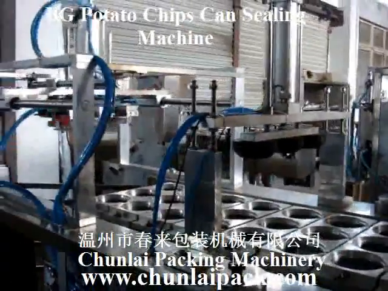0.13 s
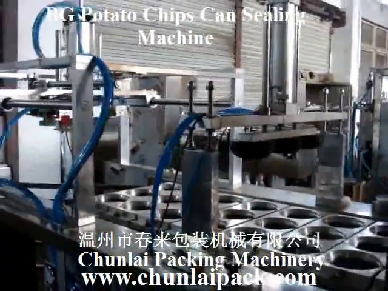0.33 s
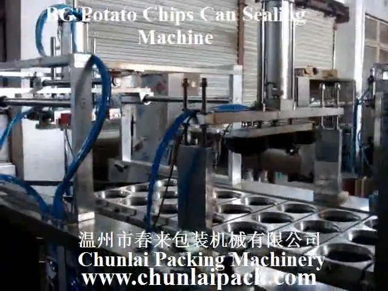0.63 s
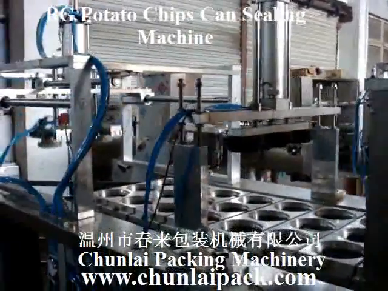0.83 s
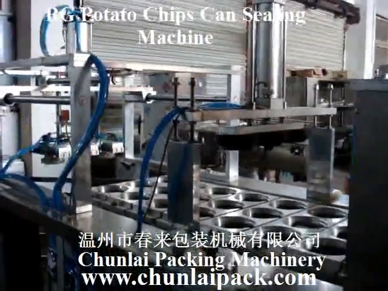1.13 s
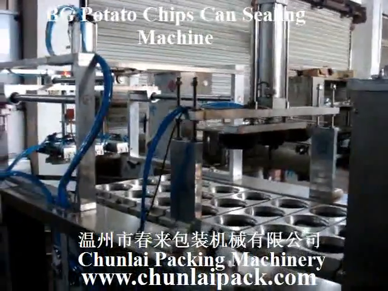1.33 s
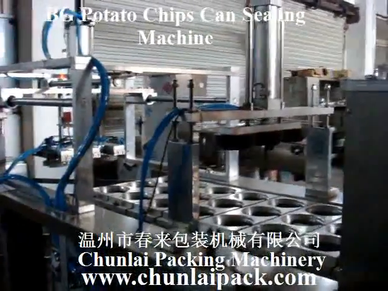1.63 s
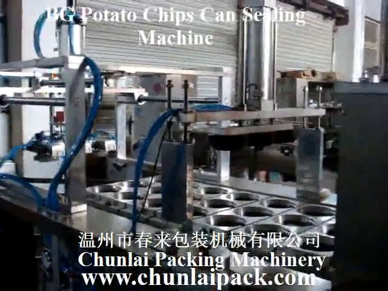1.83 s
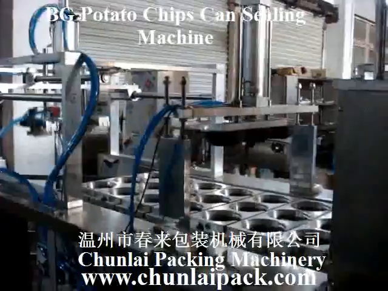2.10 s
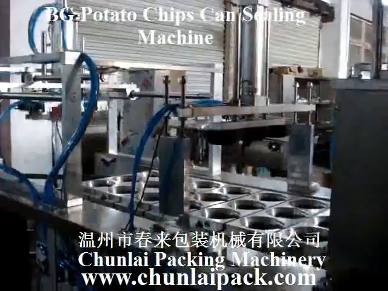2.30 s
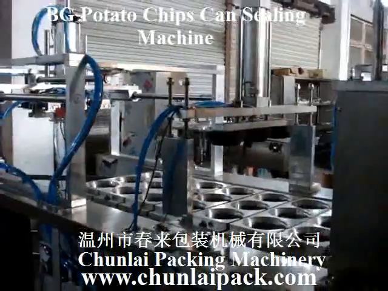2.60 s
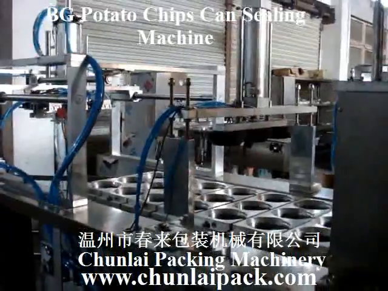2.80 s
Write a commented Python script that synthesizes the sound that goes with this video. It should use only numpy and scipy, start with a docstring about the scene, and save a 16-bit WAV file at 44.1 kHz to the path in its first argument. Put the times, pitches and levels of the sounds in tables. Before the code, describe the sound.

A pneumatic packaging machine hisses and knocks in a workshop. Air rushes hollowly with a couple of knocks, then a loud, bright blast vents from about 0.6 to 1.2 seconds. Short puffs, quick metal knocks and a brief shuddering rush follow. A second blast runs from 1.8 to 2.4 seconds, then two puffs with knocks near 2.6 and 2.8. A thin leak and motor drone lie beneath.

```python
"""A workshop, where a pneumatic can-sealing machine works through its cycle.
Two valves vent in long bright blasts, smaller ones puff, air rushes hollowly through the
suction lines and cylinders knock on their stops. A thin leak, diffuse hiss and the drone of
motors lie beneath; the mono recorder turns its gain down under the blasts."""
import sys
import numpy as np
from scipy import signal
from scipy.fft import rfft, irfft
from scipy.io import wavfile
from scipy.ndimage import uniform_filter1d

SR = 44100
rng = np.random.default_rng(int(sys.argv[2]) if len(sys.argv) > 2 else 0)


def store_wav(level_fs):
    """Save 16-bit WAV to argv[1]."""
    pcm = np.round(np.clip(np.atleast_2d(level_fs), -1, 1) * 32767)
    wavfile.write(sys.argv[1], SR, pcm.T.astype(np.int16))


N = 130095
T = np.arange(N) / SR
HZ = np.maximum(np.arange(N // 2 + 1) * SR / N, 1)
CUTOFF_HZ = 8560


def exhausts():
    """Two big valves vent in a bright hiss, coloured by narrow resonances of room and steel frame."""
    # Each row: opening and closing time in seconds.
    spans = [(.635, 1.188), (1.847, 2.43)]
    # Each row: level in dB, slope while open in dB/s, fall after closing in dB/s.
    flows = [(-11.5, -6.5, 211), (-12, 5, 191)]
    # One hiss spectrum per valve. Each row: frequency in Hz, level in dB.
    colours = [
        [(100, -58), (300, -24), (800, -9), (1150, -12.5), (2200, -7), (3600, -4.5), (4700, -2), (5800, 3),
         (6500, 5.5), (7300, 1), (8400, 4)],
        [(100, -28.5), (300, -23.5), (800, -13.5), (1400, -16), (2100, -9.5), (3300, -8), (4100, -2),
         (4800, -7), (6400, 0), (7400, -5), (8400, -1.5)],
    ]
    # One list per valve. Each row: frequency in Hz, width in Hz, level in dB against the hiss.
    resonances = [
        [(1564, 36, -18.5), (3110, 90, -18.5), (3980, 34, -17), (4090, 30, -19), (4160, 36, -23.5),
         (5012, 16, -20), (5440, 25, -29), (5440, 44, -16.5), (6350, 30, -18), (5940, 20, -25.5),
         (5843, 40, -10), (6750, 31, -11.5), (7480, 37, -18.5), (7550, 78, -11)],
        [(2304, 21, -23), (3910, 50, -17.5), (3800, 20, -23), (4480, 28, -16), (4900, 22, -21),
         (5055, 50, -13.5), (5480, 25, -21), (5560, 24, -18), (5810, 25, -22), (5900, 30, -18), (6660, 17, -25),
         (6960, 43, -15.5), (6390, 45, -14), (7103, 50, -10)],
    ]
    out = 0
    for span_s, (db, slope_db_s, fall_db_s), colour, modes in zip(spans, flows, colours, resonances):
        hiss = turbulence(colour)
        ring = sum(from_db(mode_db) * resonance(hz, width_hz) for hz, width_hz, mode_db in modes)
        flow = valve(*span_s, rise_s=.007, fall_db_s=fall_db_s, slope_db_s=slope_db_s)
        out += from_db(db) * (hiss + ring) * flow
    return out * flutter(depth_db=.5, rate_hz=47)


def puffs():
    """Small valves spit briefly as they switch."""
    # Each row: start, rise and length in seconds, level in dB, fall in dB/s.
    spits = [(0.258, 0.0068, 0.03, -17, 74), (1.339, 0.018, 0.0081, -14.5, 336),
             (1.484, .006, 0.02, -26.5, 118), (1.573, .008, 0.027, -27, 121.5),
             (1.751, .008, 0.049, -20, 81), (2.554, 0.0027, 0.008, -12, 480),
             (2.779, 0.012, 0.0067, -20, 104)]
    # Jet spectrum. Each row: frequency in Hz, level in dB.
    colour = [(200, -43), (1000, -15), (2500, -7), (4200, -2.5), (5800, 3.5), (7300, 1.5), (8400, 2.5)]
    flow = sum(from_db(db) * valve(start_s, start_s + length_s, rise_s, fall_db_s)
               for start_s, rise_s, length_s, db, fall_db_s in spits)
    return flow * turbulence(colour)


def suction():
    """Air rushes unevenly through a pipe whose hollow note fades; the second stroke shudders."""
    # Each row: start and stop in seconds, level in dB, slope in dB/s, pipe resonance in Hz.
    strokes = [(-.02, 0.655, -20, -3.5, 766), (1.671, 1.851, -20.5, -13, 890)]
    # Rush spectrum. Each row: frequency in Hz, level in dB.
    colour = [(50, -58), (110, -17), (200, -11.5), (290, -4), (385, 4), (470, 3.5), (580, 3), (900, 0),
              (1200, 0.5), (1700, -2.5), (2300, -4), (3200, -13.5), (5000, -19.5), (8400, -10.5)]
    rise_s, fall_db_s, pipe_fade_db_s = .019, 1007, 8
    shudder = from_db(-34.5) * resonance(hz=135, width_hz=120)
    out = shudder * valve(1.73, 1.857, rise_s, fall_db_s)
    for start_s, stop_s, db, slope_db_s, pipe_hz in strokes:
        pipe_db = -3.5 - pipe_fade_db_s * np.maximum(T - start_s, 0)
        pipe = from_db(pipe_db) * resonance(pipe_hz, width_hz=170)
        rush = cabinet(turbulence(colour) + pipe)
        out += from_db(db) * rush * valve(start_s, stop_s, rise_s, fall_db_s, slope_db_s)
    return out * flutter(depth_db=1.5, rate_hz=92)


def knocks():
    """Cylinders hit their stops: part and steel frame ring under a clatter. Cushioned stops are duller."""
    # Each entry: time of impact in seconds.
    times = [.004, .263, .643, 1.138, 1.489, 1.589, 1.685, 1.73, 1.769, 1.849, 1.915, 2.553, 2.787]
    # Each row: level in dB, low-pass in Hz, clatter T60 in seconds, pitch of the struck part in Hz,
    # its level in dB against the clatter.
    impacts = [(-18, 1200, 0.36, 814, 3.5), (-15, 2500, .05, 680, -6), (-19.5, 1100, .025, 410, 10.5),
               (-33.5, 230, 0.07, 100, 5), (-24.5, 1700, 0.065, 1100, 2.5), (-19, 5000, 0.099, 940, -8),
               (-23, 2800, 0.063, 740, -1), (-14.5, 1500, 0.067, 680, -9.5), (-18, 1600, 0.064, 1250, 4.5),
               (-14, 2800, .03, 1900, 1), (-19, 1400, 0.39, 850, -6), (-15.5, 1350, 0.023, 650, 3),
               (-17.5, 1120, 0.21, 1040, -8.5)]
    # Each row: frequency in Hz, level in dB, T60 in seconds.
    frame_modes = [(283, -10, 0.13), (381, -3, 0.09), (645, -18, 0.067), (835, -6, 0.098),
                   (1130, -6.5, 0.047), (1325, -15, 0.13), (1640, -7.5, 0.055), (2370, -4.5, 0.055),
                   (2640, -11, .08)]
    clatter = from_db(-1) * turbulence([(40, -27.5), (140, -14), (400, 9.5), (1800, 17), (8000, -11)])
    out = 0
    for start_s, (db, lowpass_hz, clatter_t60_s, part_hz, part_db) in zip(times, impacts):
        age_s = np.maximum(T - start_s, 0)
        ring_s = age_s[age_s < .5]
        ring = 0
        for hz, mode_db, t60_s in frame_modes:
            decay = from_db(mode_db + rng.normal(0, 2.9) - 60 * ring_s / t60_s)
            ring += decay * rng.choice([-1, 1]) * np.cos(2 * np.pi * hz * ring_s)
        frame = from_db(-10.5) * np.pad(ring, (0, N - len(ring)))
        part = from_db(part_db) * resonance(part_hz, width_hz=260)
        burst = (T > start_s) * from_db(-60 * np.minimum(age_s / clatter_t60_s, 2))
        out += from_db(db) * butterworth(frame + (clatter + part) * burst, "low", lowpass_hz)
    return butterworth(out, "high", hz=125, order=3)


def leak():
    """Escaping air hisses thinly, fading away and returning."""
    # Each row: time in seconds, level in dB.
    curve = [(0, -26), (.6, -26.5), (1.2, -30), (1.3, -33), (1.48, -32.5), (1.7, -27.5), (1.85, -28),
             (2.45, -72.5), (2.58, -27), (2.775, -51.5), (2.795, -26), (2.95, -26.5)]
    # Each row: frequency in Hz, level in dB.
    colour = [(1500, -38.5), (3300, -17), (4400, -3), (5400, -20), (6800, -8.5), (7600, -1), (8050, 7),
              (8450, 0.5)]
    return level(curve) * turbulence(colour) * flutter(depth_db=1.9, rate_hz=60)


def hall_hiss():
    """Diffuse hiss fills the hall."""
    # Each row: time in seconds, level in dB.
    curve = [(0, -23.5), (1.2, -24.5), (1.38, -27), (1.46, -30.5), (1.65, -30), (2.45, -24.5), (2.6, -26),
             (2.7, -32), (2.775, -35), (2.82, -29.5), (2.95, -35.5)]
    # Each row: frequency in Hz, level in dB.
    colour = [(400, -35), (1000, 6), (2200, 12), (3200, 10.5), (4500, 9), (5600, 8), (6800, 3), (8400, -23)]
    return level(curve) * turbulence(colour)


def motors():
    """A wavering drone, coloured by the cabinet."""
    # Each row: time in seconds, level in dB.
    curve = [(0, -34.5), (1.2, -38), (1.4, -32), (1.85, -32.5), (2.5, -32), (2.62, -30), (2.75, -33),
             (2.95, -31)]
    # Each row: frequency in Hz, level in dB.
    colour = [(25, -23.5), (45, -26.5), (70, -25.5), (95, -14), (125, -7.5), (190, -7), (280, 0), (520, 4),
              (850, 5), (1100, 1), (1600, -1.5), (3000, -13.5), (8000, -37)]
    return cabinet(level(curve) * turbulence(colour) * flutter(depth_db=1, rate_hz=41))


def cabinet(x):
    """The hollow cabinet boosts a sound at its resonances."""
    # Each row: frequency in Hz, width in Hz, boost in dB.
    modes = [(127, 7, 6), (189, 8.2, 4), (274.7, 13.4, 8.5), (384.5, 6.1, 8), (641.4, 8.8, 5.5),
             (737, 8.4, 7), (845.4, 11, 7.5), (1173, 7, 4.5), (1384, 23, 1), (1400, 17, 2.5)]
    return x + sum((from_db(db) - 1) * signal.lfilter(*signal.iirpeak(hz, hz / width_hz, fs=SR), x)
                   for hz, width_hz, db in modes)


def reflections(x, t60_s):
    """Dense, dying reflections from hard surfaces."""
    tail = rng.standard_normal(N) * from_db(-60 * T / t60_s) * (T > .003)
    return signal.fftconvolve(x, tail / np.sqrt(np.sum(tail ** 2)))[:N]


def valve(open_s, close_s, rise_s, fall_db_s, slope_db_s=0):
    """Flow envelope: linear rise, level or sloping hold, exponential fall after closing."""
    rise = np.clip((T - open_s) / rise_s, 0, 1)
    held_s = np.clip(T - open_s, 0, close_s - open_s)
    return rise * from_db(slope_db_s * held_s - fall_db_s * np.maximum(T - close_s, 0))


def turbulence(colour):
    """Noise with a spectrum of (Hz, dB) points, rolled off at CUTOFF_HZ."""
    hz, db = np.transpose(colour)
    gain = from_db(np.interp(np.log(HZ), np.log(hz), db))
    return shaped_noise(gain / (1 + (HZ / CUTOFF_HZ) ** 40))


def resonance(hz, width_hz):
    """Turbulence ringing in one resonance."""
    detune_hz = (HZ ** 2 - hz ** 2) / (2 * HZ)
    return shaped_noise(1 / (1 + (1.3 * detune_hz / width_hz) ** 2))


def flutter(depth_db, rate_hz):
    """Randomly wandering gain; depth is rms."""
    return from_db(depth_db * shaped_noise(1 / (1 + (HZ / rate_hz) ** 2)))


def shaped_noise(gain):
    """Unit-rms noise, weighted by a gain per frequency."""
    noise = irfft(rfft(rng.standard_normal(N)) * gain, N)
    return noise / np.sqrt(np.mean(noise ** 2) + 1e-20)


def level(curve):
    """Gain along a curve of (s, dB) points."""
    return from_db(np.interp(T, *np.transpose(curve)))


def butterworth(x, kind, hz, order=2):
    """Low- or high-pass filter."""
    return signal.sosfilt(signal.butter(order, hz, kind, fs=SR, output="sos"), x)


def from_db(db):
    """Decibels to gain."""
    return 10 ** (np.asarray(db) / 20)


def scene():
    """The whole machine, alike in both channels; only the knocks get a reverb tail."""
    blows = knocks()
    machine = exhausts() + puffs() + suction() + blows
    reverb = from_db(-5.5) * reflections(blows, t60_s=.16)
    mono = machine + reverb + leak() + hall_hiss() + motors()
    return np.array([mono, mono])


def record(dry):
    """The microphone thins the bass, gain control holds loud passages down and the top is cut."""
    threshold_db, reduction_share, attack_s, release_db_s = -19.5, .75, .012, 61.5
    sound = butterworth(dry, "high", hz=70)
    power = uniform_filter1d(sound[0] ** 2, size=500)
    over_db = np.maximum(10 * np.log10(np.maximum(power, 1e-12)) - threshold_db, 0)
    held_db = np.maximum.accumulate(over_db + release_db_s * T) - release_db_s * T
    pole = np.exp(-1 / (attack_s * SR))
    reduction_db = reduction_share * signal.lfilter([1 - pole], [1, -pole], held_db)
    top_cut = signal.ellip(12, .2, 85, CUTOFF_HZ, fs=SR, output="sos")
    return signal.sosfilt(top_cut, sound * from_db(-reduction_db))


dry = scene()
out = record(dry)
store_wav(out)
```